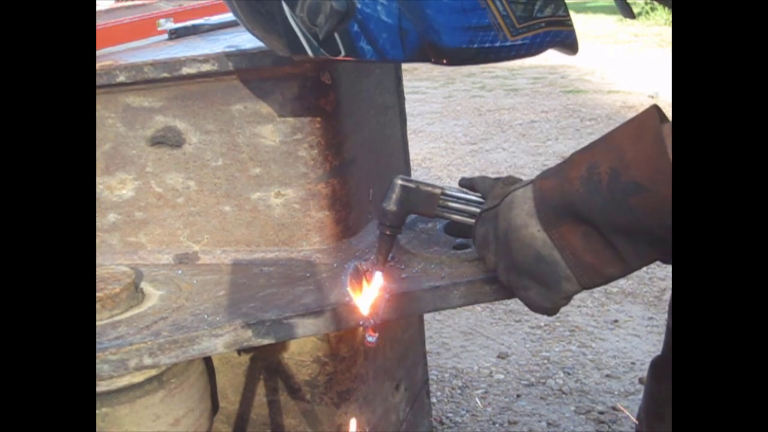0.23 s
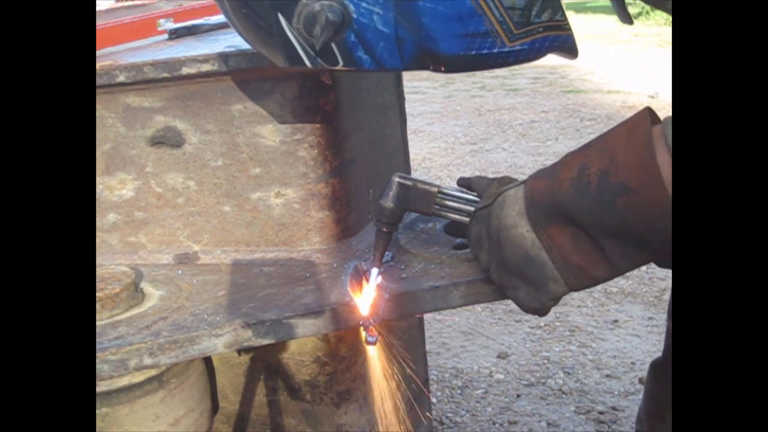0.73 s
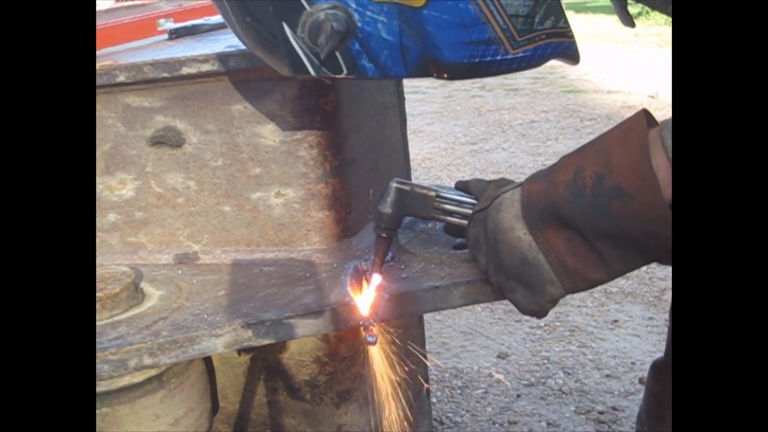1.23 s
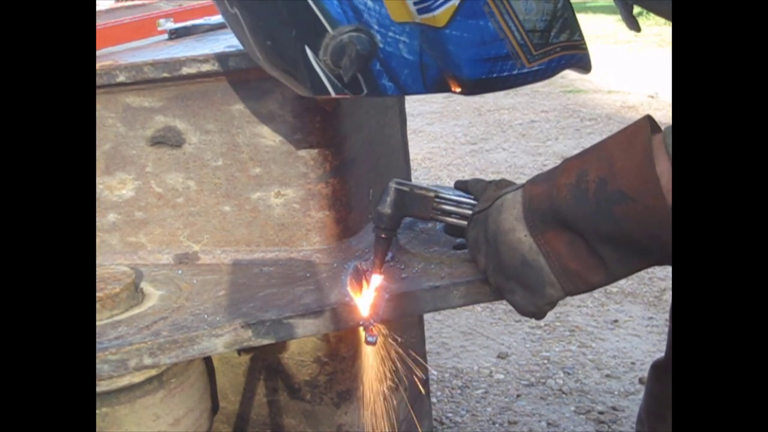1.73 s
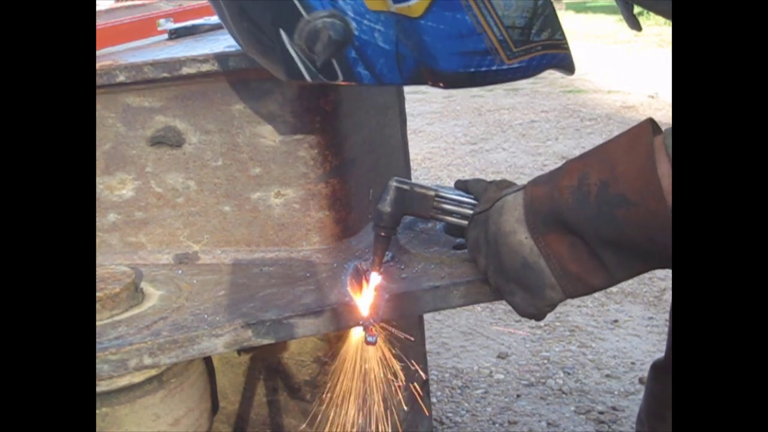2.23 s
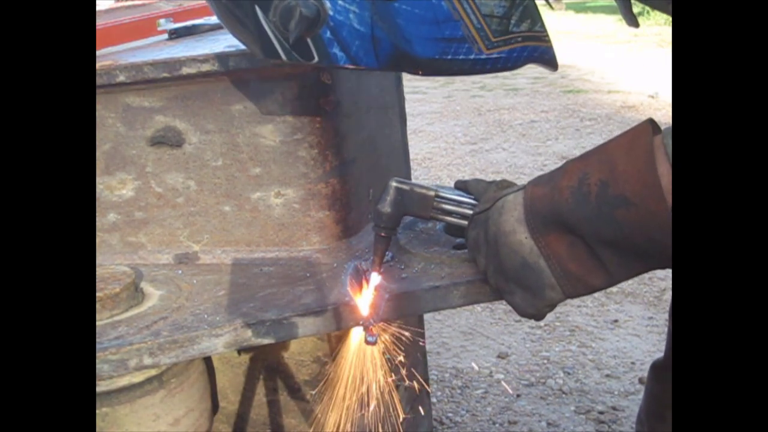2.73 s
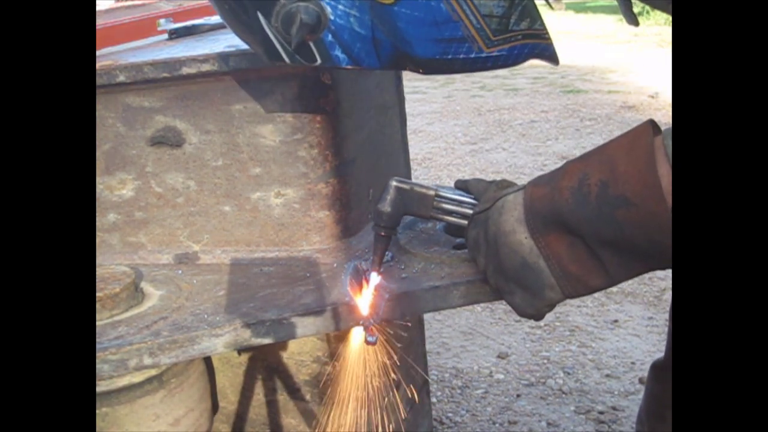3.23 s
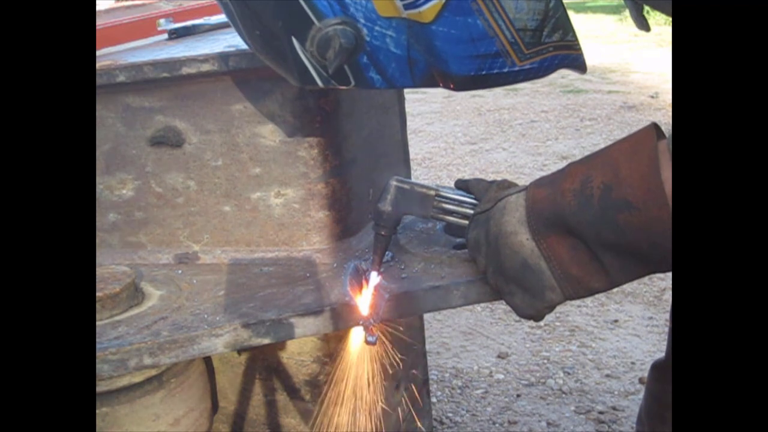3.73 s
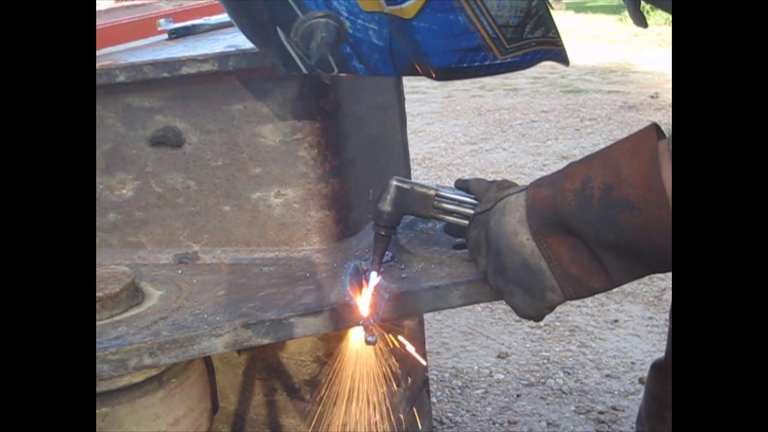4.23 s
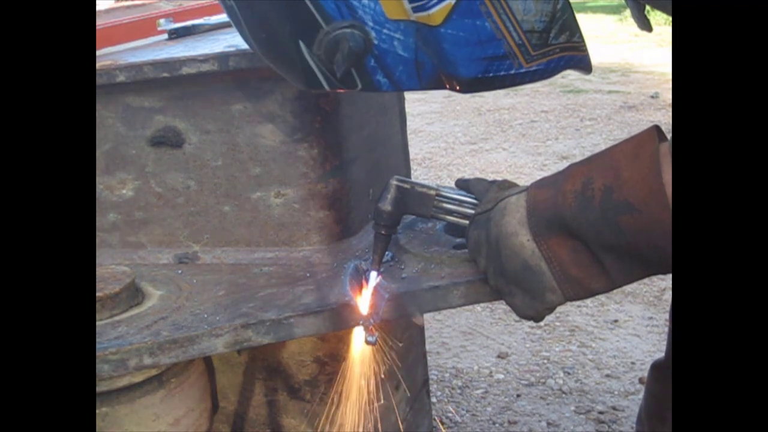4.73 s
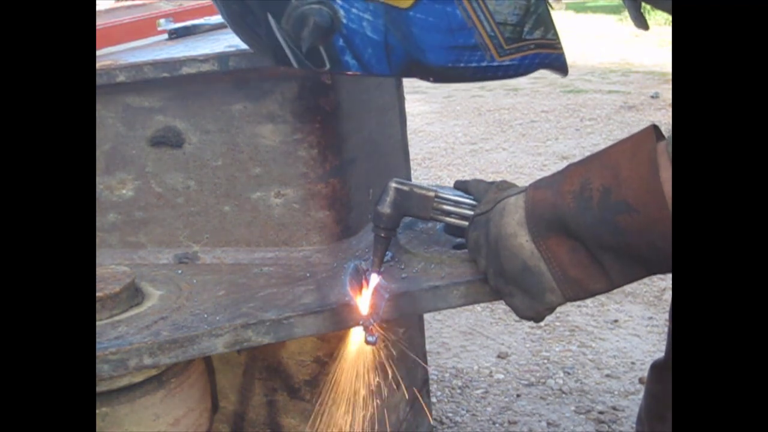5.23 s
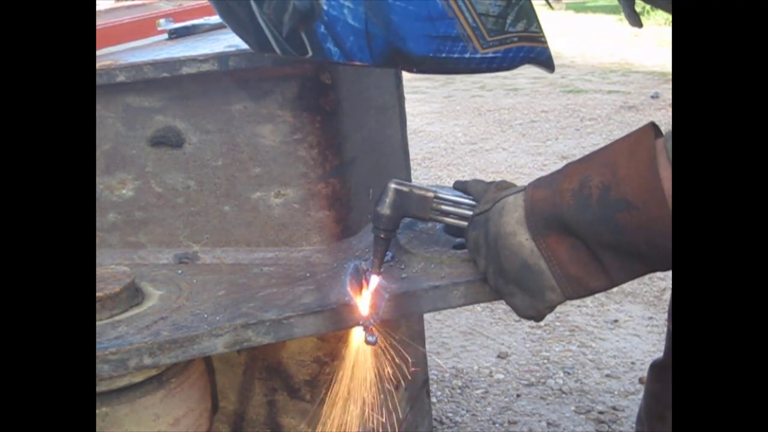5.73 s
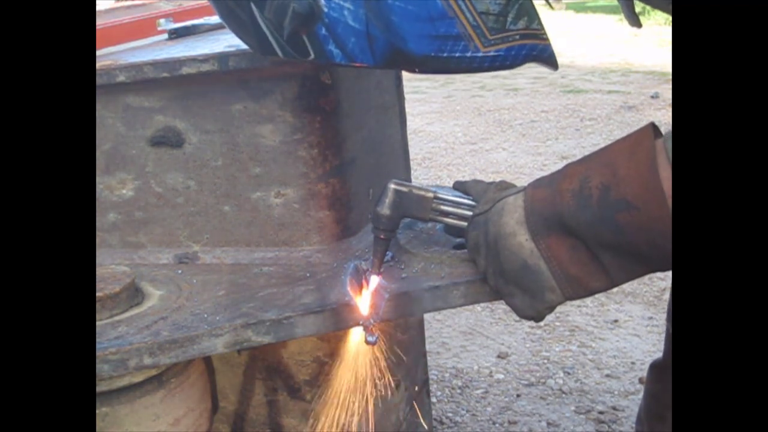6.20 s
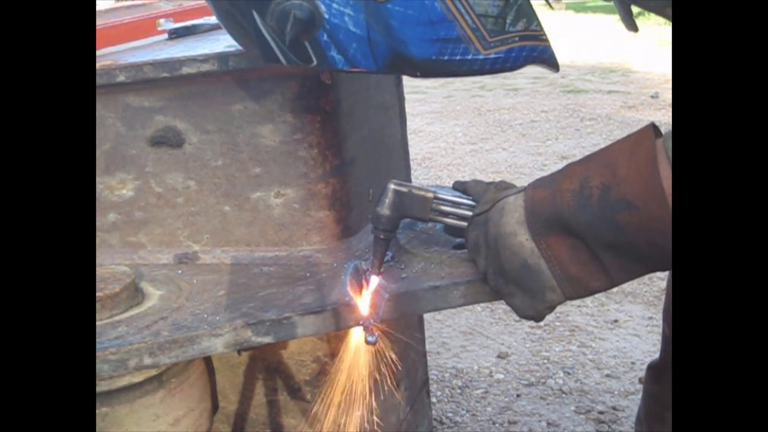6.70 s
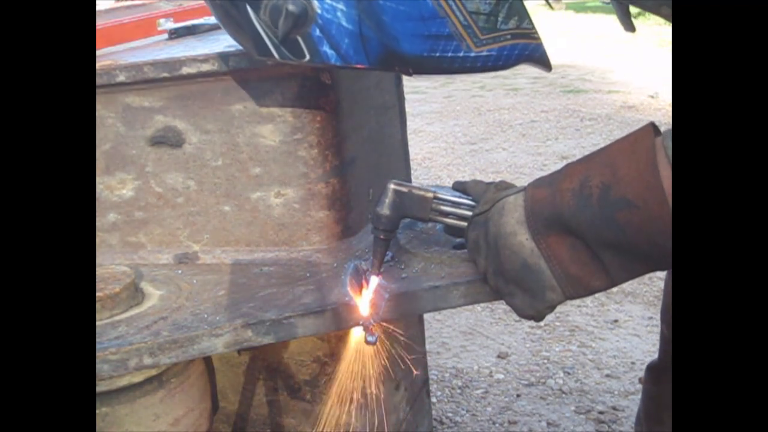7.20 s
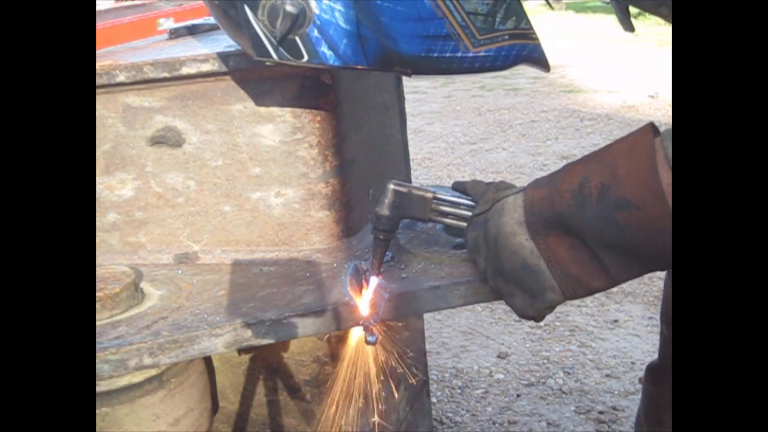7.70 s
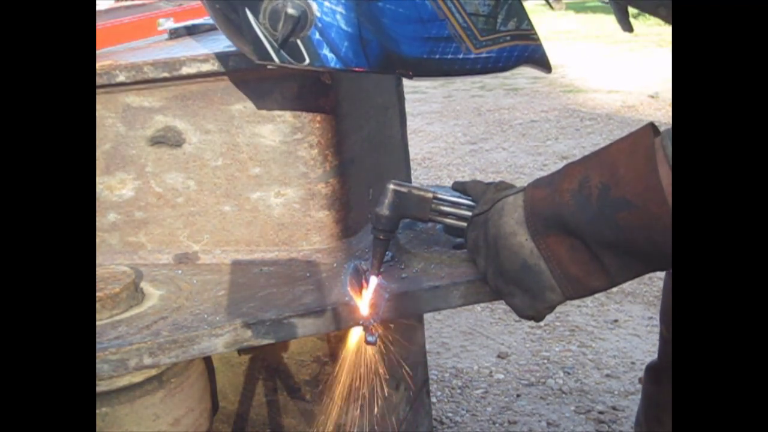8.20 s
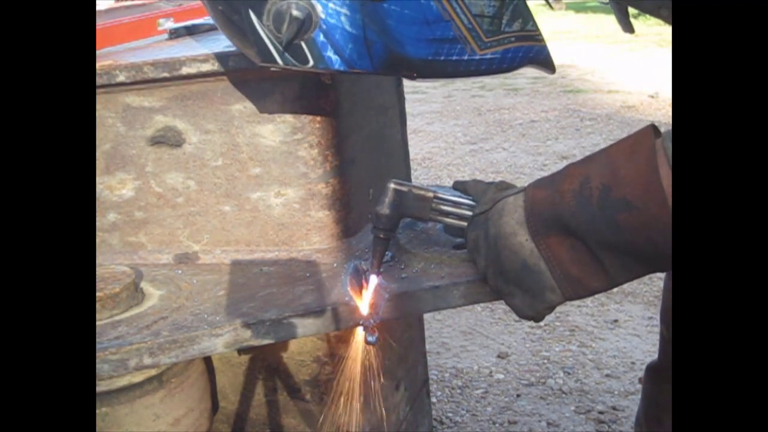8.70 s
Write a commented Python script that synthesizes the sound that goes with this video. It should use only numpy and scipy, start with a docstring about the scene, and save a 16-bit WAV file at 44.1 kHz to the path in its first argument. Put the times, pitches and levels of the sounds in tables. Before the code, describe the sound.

Close to the microphone, an oxy-fuel torch cuts thick steel in an open yard. Its dense, bright hiss and rushing gas run without a break, with a rough flutter and thin sizzle on top. The balance wavers in the first two seconds, then holds steadier with small shifts. Very faint low rumble and a distant idling engine lie beneath.

```python
"""Oxy-fuel torch cutting thick steel

Outdoors in a yard, one microphone close to the torch. Bands of noise make the flame's roar and rush, the gas
blowing through the kerf, the oxygen jet's hiss and the sizzle at its edge; all flutter as slag clears.
Frame and ground return short echoes, two short bounces colour the highest treble, a hollow of the frame hums.
Far off, an engine idles as a few wavering sines over a low rumble of noise."""
import sys
import numpy as np
from scipy import signal
from scipy.fft import irfft
from scipy.io import wavfile
from scipy.ndimage import uniform_filter1d, map_coordinates

SR = 44100
rng = np.random.default_rng(int(sys.argv[2]) if len(sys.argv) > 2 else 0)


def transcribe(u):
    """Save the signal u as a 16-bit wav file named by the first command-line argument.

    u: samples, shape (n,) or (channels, n), limited to [-1, 1]; the rate is SR.
    q: integer samples, one column per channel.
    """
    v = np.clip(np.atleast_2d(u).T, -1, 1)
    q = np.round(v * 32767).astype(np.int16)
    wavfile.write(sys.argv[1], SR, q)


N = 394694   # length in samples
STEP = 40   # samples between control values


def from_db(db):
    """Decibels to gain."""
    return 10 ** (np.asarray(db) / 20)


def rms_one(x):
    """Scale to rms 1."""
    return x / np.sqrt(np.mean(x ** 2) + 1e-20)


def in_time(rows):
    """Columns of a curve table after its time_s, each as one value per sample."""
    time_s, *columns = np.transpose(rows)
    return [np.interp(np.arange(N) / SR, time_s, column) for column in columns]


def per_sample(control):
    """From control rate to one value per sample."""
    return np.interp(np.arange(N) / STEP, np.arange(len(control)), control)


def drift(rate_hz):
    """Slow chance at control rate: noise through a double one-pole low-pass, rms 1."""
    pole = np.exp(-2 * np.pi * STEP * rate_hz / SR)
    noise = rng.standard_normal(N // STEP + 2002)
    slow = signal.lfilter([1], [1, -2 * pole, pole * pole], noise)
    return rms_one(slow[2000:])   # without the filter's run-in


def turbulence(spectrum, shared_db, own_db, own_rate_hz):
    """Gas or air noise in third-octave bands, with a flicker in common and one for each band; rms 1."""
    hz_points, db_points = np.transpose(spectrum)
    edges_hz = 20 * 2 ** (np.arange(31) / 3)
    white = rng.standard_normal((2, N))   # neighbouring bands get unrelated noise
    total = 0
    for k, (low, high) in enumerate(zip(edges_hz, edges_hz[1:])):
        centre_hz = np.sqrt(low * high)
        if hz_points[0] / 1.1 < centre_hz < hz_points[-1] * 1.2:
            band_pass = signal.butter(2, [low, high], "band", fs=SR, output="sos")
            band = signal.sosfilt(band_pass, white[k % 2])
            level_db = np.interp(np.log(centre_hz), np.log(hz_points), db_points)
            flicker_db = shared_db + own_db * drift(own_rate_hz)
            total = total + band * per_sample(from_db(level_db + flicker_db))
    return rms_one(total)


# shape of the yard's low rumble: hz, relative_db
RUMBLE_SPECTRUM = [(20, -10), (40, -14), (60, -5), (120, -9), (200, -4.5), (400, -21)]
# rumble at the microphone: time_s, level_db
RUMBLE_LEVEL = [(0, -57), (1, -58), (2.2, -57.5), (8.95, -49)]


def yard_rumble():
    """Low outdoor rumble: noise bands that swell slowly, together and singly."""
    rumble = turbulence(RUMBLE_SPECTRUM, .5 * drift(1.5), own_db=1.2, own_rate_hz=2.5)
    level_db, = in_time(RUMBLE_LEVEL)
    return from_db(level_db) * rumble


# engine far off, before its waver: time_s, firing_hz, level_db
ENGINE = [(0, 78.5, -57), (1, 80, -74), (2.2, 76.6, -58), (4, 76.9, -65), (4.9, 70.8, -59),
          (7.7, 78.3, -63.5), (8.95, 79, -64)]
# partials of its hum: multiple (of the firing rate), relative_db
ENGINE_ORDERS = [(.5, -11), (1, -0.5), (2.1, -14)]


def distant_engine():
    """Idling hum: sines at multiples of a wavering firing rate, each wavering in level."""
    firing_hz, level_db = in_time(ENGINE)
    wavering_hz = firing_hz * (1 + 0.0128 * per_sample(drift(3.4)))
    turns = np.cumsum(wavering_hz) / SR
    hum = 0
    for multiple, order_db in ENGINE_ORDERS:
        gain = per_sample(from_db(order_db + 2.2 * drift(3.1)))
        hum = hum + gain * np.sin(2 * np.pi * multiple * turns)
    return np.sqrt(2) * from_db(level_db) * hum   # a sine of peak sqrt(2) has rms 1


# hollow part of the frame that the flame sets humming: pitch_hz, width_hz, level_db
HOLLOW = (336.5, 21, -52)


def hollow():
    """The frame's hollow hums: noise through one narrow resonance, swelling slowly."""
    pitch_hz, width_hz, level_db = HOLLOW
    radius = np.exp(-np.pi * width_hz / SR)
    resonance = [1, -2 * radius * np.cos(2 * np.pi * pitch_hz / SR), radius * radius]
    tone = signal.lfilter([1, 0, -1], resonance, rng.standard_normal(N))
    return rms_one(tone) * per_sample(from_db(level_db + 1.1 * drift(0.41)))


# echoes off frame, plate and ground; the torch creeps along unevenly, so paths lengthen or shorten:
# start_ms, middle_ms, end_ms (delays), start_share, middle_share, end_share (of pressure, before dulling)
ECHOES = [(0.312, 0.437, 0.267, 0.06, 0.14, -0.04), (0.45, 0.444, 0.43, 0.29, 0.05, 0.11),
          (0.519, 0.524, 0.539, 0.01, -0.15, -0.21), (0.601, 0.585, 0.633, -0.23, 0.01, -0.3),
          (0.751, 0.645, 0.632, -0.02, 0.07, 0.17), (0.863, 0.784, 0.734, 0.12, -0.03, -0.14),
          (0.992, 0.952, 0.976, -0.1, 0.0, -0.12), (1.004, 1.112, 1.07, 0.05, 0.05, 0.08),
          (1.272, 1.235, 1.193, 0.06, -0.06, -0.13), (1.412, 1.418, 1.353, 0.12, 0.07, -0.06),
          (1.593, 1.529, 1.475, -0.02, 0.19, 0.2), (1.601, 1.657, 1.54, 0.23, -0.05, 0.27),
          (1.941, 1.92, 2.015, -0.02, -0.06, 0.05), (1.962, 2.065, 2.095, 0.1, -0.05, -0.04),
          (2.242, 2.213, 2.181, -0.07, -0.02, 0.05), (2.384, 2.451, 2.39, 0.07, 0.08, 0.06),
          (2.477, 2.552, 2.504, 0.15, 0.14, 0.11), (2.573, 2.648, 2.574, 0.16, 0.07, 0.12),
          (2.575, 2.752, 2.727, -0.02, 0.07, 0.13), (2.898, 2.885, 2.825, 0.07, 0.05, 0.07),
          (3.16, 3.164, 3.172, -0.02, -0.07, -0.08), (3.261, 3.344, 3.299, -0.01, 0.11, 0.09),
          (3.648, 3.652, 3.655, 0.03, -0.07, -0.06), (3.684, 3.829, 3.789, -0.01, 0.11, 0.12),
          (3.811, 3.839, 3.827, 0.05, -0.14, -0.08), (4.239, 4.27, 4.365, 0.04, 0.05, 0.05),
          (4.498, 4.555, 4.523, -0.02, -0.06, -0.04), (4.691, 4.657, 4.673, 0.0, -0.04, -0.03),
          (4.824, 4.902, 4.883, -0.01, -0.04, -0.02), (5.236, 5.108, 5.041, 0.04, 0.03, 0.06),
          (5.396, 5.515, 5.473, -0.03, 0.03, 0.04), (10.368, 10.416, 10.429, -0.01, -0.03, -0.01)]
ECHO_DULL_HZ = 9000
STAGE_COUNT = 15   # echo patterns computed along the cut
SCATTER_DB, SCATTER_T60_S = -37, .05   # many faint echoes off the clutter of the yard


def echoes(x):
    """Direct sound plus dulled echoes, fading from the pattern of one stage to the next."""
    hz = np.linspace(0, SR / 2, 1025)
    along = np.linspace(0, 1, STAGE_COUNT)
    paths = 0
    for echo in ECHOES:
        delay_ms = np.interp(along, [0, .5, 1], echo[:3])
        share = np.interp(along, [0, .5, 1], echo[3:])
        paths = paths + share[:, None] * np.exp(-2j * np.pi * np.outer(delay_ms, hz) / 1000)
    responses = irfft(paths / (1 + 1j * hz / ECHO_DULL_HZ) ** 2)
    # scatter begins after a millisecond and dies away
    age_s = np.arange(responses.shape[1]) / SR
    dying = from_db(SCATTER_DB - 60 * age_s / SCATTER_T60_S) * (age_s > .001)
    responses = responses + dying * rng.standard_normal(responses.shape)
    back = signal.oaconvolve(x[None], responses, axes=1)[:, :N]
    fades = [np.interp(np.arange(N) / N, along, row) for row in np.eye(STAGE_COUNT)]
    return x + np.sum(back * fades, axis=0)


# bright bounce off the plate beside the nozzle, before its waver; the hand resettles now and then:
# time_s, delay_ms, share (of pressure)
BOUNCE = [(0, .474, .3), (1.0, .466, .55), (1.55, .44, .1), (1.95, .425, .3), (2.1, .378, .25),
          (3.1, .378, .55), (5.15, .375, .5), (5.25, .309, .4), (6.6, .31, .35), (7.1, .31, .5),
          (7.3, .392, .4), (8.95, .39, .45)]
GLOVE_MS, GLOVE_WANDER_MS, GLOVE_SHARE = .95, .03, .3   # second, restless bounce off the gloved hand


def bounce(x):
    """Two copies about a millisecond late or less cut notches that wander as the hand trembles."""
    delay_ms, share = in_time(BOUNCE)
    delay_ms = delay_ms + .007 * per_sample(drift(6))
    share = np.clip(share + .12 * per_sample(drift(1.5)), 0, 1)
    glove_ms = GLOVE_MS + GLOVE_WANDER_MS * per_sample(drift(.8))
    plate, glove = [map_coordinates(x, [np.arange(N) - ms * SR / 1000], order=3)
                    for ms in (delay_ms, glove_ms)]
    return (x + share * plate + GLOVE_SHARE * glove) / np.sqrt(1 + share ** 2 + GLOVE_SHARE ** 2)


# four courses of the gas, of which only the swing about the mean is used: time_s, level_db
# the flame's low rush, rising when slag chokes the kerf
FLAME_LEVEL = [(0.0, -29), (0.24, -26.5), (0.68, -32.5), (1.2, -32.0), (1.36, -26), (2.36, -30.5),
               (2.48, -27.5), (2.6, -30.5), (3.52, -30.0), (4.32, -27), (5.12, -29.5), (5.8, -29.5),
               (6.24, -26.0), (6.32, -28.5), (7.12, -29.5), (8.64, -28.5), (8.68, -28.5), (8.92, -31)]
# the gas blowing through the kerf
BLOW_LEVEL = [(0.0, -25.5), (0.28, -30), (0.4, -24), (1.08, -27.0), (1.44, -24.5), (2.16, -26.5),
              (4.52, -24), (4.68, -22.5), (4.88, -24.5), (5.96, -26.5), (6.08, -25), (8.56, -23),
              (8.64, -26), (8.92, -25)]
# the oxygen jet's hiss
JET_LEVEL = [(0.0, -22), (0.28, -28.5), (0.4, -22.5), (1.56, -25.5), (1.84, -26.5), (2.0, -21.5),
             (2.44, -20), (2.56, -22.5), (3.36, -23.0), (3.52, -21.5), (3.68, -23.5), (4.32, -22),
             (4.84, -24.5), (6.08, -22), (7.12, -24.0), (7.28, -21.5), (7.92, -24.5), (8.0, -22),
             (8.64, -24), (8.92, -22.5)]
# the thin treble sizzle
TREBLE_LEVEL = [(0.0, -29), (0.48, -26.5), (0.92, -32), (1.12, -29.5), (1.28, -30.5), (1.48, -36),
                (2.28, -31.0), (2.68, -29.0), (2.76, -34), (2.96, -32.5), (3.12, -29), (4.36, -32.5),
                (4.44, -29.5), (5.16, -34), (5.36, -38), (5.48, -32), (6.64, -35.5), (6.76, -31),
                (7.12, -32.0), (7.24, -28.5), (7.36, -34), (7.48, -31.0), (7.8, -32.5), (8.08, -30.5),
                (8.44, -31.5), (8.92, -26.5)]
# rows roar, rush, blow-through, hiss, sizzle, top; level before echoes, then shares of the four swings:
# mean_db, flame_share, blow_share, jet_share, treble_share
PARTS = [(-34, 0.83, 0.0, 0.031, 0.0), (-29.5, 1.07, 0.27, 0.0, 0.0), (-26, 0.0, 0.93, 0.077, 0.0),
         (-24.5, 0.0, 0.29, 1.27, 0.0), (-26.5, 0.043, 0.054, 0.33, 0.49), (-35, 0.0, 0.0, 0.0, 1.3)]


def gas_flow_levels():
    """One unsteady gas flow moves the levels (dB) of all six parts; each also wavers by itself."""
    courses = (FLAME_LEVEL, BLOW_LEVEL, JET_LEVEL, TREBLE_LEVEL)
    levels = np.array([in_time(course)[0] for course in courses])
    swings = levels - levels.mean(axis=1, keepdims=True)
    swings = uniform_filter1d(swings, size=SR // 16, mode="nearest")   # the gas flow cannot jump
    waver_db, waver_rate_hz = 0.86, 2.05
    return [mean_db + np.dot(shares, swings) + waver_db * per_sample(drift(waver_rate_hz))
            for mean_db, *shares in PARTS]


# shapes of the flame's roar, its rush and the gas blowing through the kerf: hz, relative_db
ROAR = [(90, -21.5), (150, -12), (300, -5.5), (600, -3), (900, 3), (1300, -5)]
RUSH = [(650, -25), (1000, -2.5), (1400, 0.5), (1800, -7.5), (2500, -9)]
BLOW = [(1250, -13.5), (1800, -1.5), (2400, -1.5), (3000, -2), (4000, -15.5)]


def flame(roar_db, rush_db, blow_db, flutter, rasp):
    """Burning gas roars low, rushes higher up and blows through the kerf."""
    roar = turbulence(ROAR, 0.22 * flutter + 0.49 * rasp, own_db=.5, own_rate_hz=9.3)
    rush = turbulence(RUSH, 0.39 * flutter + 0.64 * rasp, own_db=0.84, own_rate_hz=15)
    blow = turbulence(BLOW, 0.27 * flutter + 0.2 * rasp, own_db=0.17, own_rate_hz=14.0)
    return from_db(roar_db) * roar + from_db(rush_db) * rush + from_db(blow_db) * blow


# shapes of the oxygen jet's hiss and of the sizzle at its edge: hz, relative_db
HISS = [(1900, -23.5), (2600, -2.5), (3400, 1.5), (4500, 2), (6000, -6.5), (8000, -23)]
SIZZLE = [(3500, -27), (5000, -0.5), (6300, -5), (8000, -4.5), (9500, -7), (11000, -14)]


def oxygen_jet(hiss_db, sizzle_db, flutter, rasp):
    """The jet hisses in the kerf and sizzles at its edge, as two overlapping bands of noise."""
    hiss = turbulence(HISS, 0.27 * flutter + 0.42 * rasp, own_db=1.05, own_rate_hz=6.5)
    sizzle = turbulence(SIZZLE, 0.14 * flutter + .5 * rasp, own_db=1.0, own_rate_hz=6.8)
    return from_db(hiss_db) * hiss + from_db(sizzle_db) * sizzle


# shape of the torch's highest treble: hz, relative_db
TOP = [(7000, -12), (9000, -8), (10500, 1.5), (12500, -2.5), (14500, -3.5), (16000, -27)]


def highest_treble(top_db, flutter, rasp):
    """The highest treble: thin hissing noise coloured only by the two short bounces."""
    top = turbulence(TOP, 0.22 * flutter + .5 * rasp, own_db=1.55, own_rate_hz=8.7)
    return from_db(top_db) * bounce(top)


def torch():
    """All parts share the gas flow, a flutter and a faster rasp; flame and jet get the echoes."""
    roar_db, rush_db, blow_db, hiss_db, sizzle_db, top_db = gas_flow_levels()
    flutter, rasp = drift(11.0), drift(66)
    burning = flame(roar_db, rush_db, blow_db, flutter, rasp)
    cutting = oxygen_jet(hiss_db, sizzle_db, flutter, rasp)
    return echoes(burning + cutting) + highest_treble(top_db, flutter, rasp)


def scene():
    """One microphone close to the torch feeds both channels."""
    yard = yard_rumble() + distant_engine()
    return np.tile(yard + hollow() + torch(), (2, 1))


def record(dry):
    """A steep low-pass at 15680 Hz cuts the top."""
    return signal.sosfilt(signal.ellip(14, .3, 80, 15680, fs=SR, output="sos"), dry)


dry = scene()
out = record(dry)
transcribe(out)
```